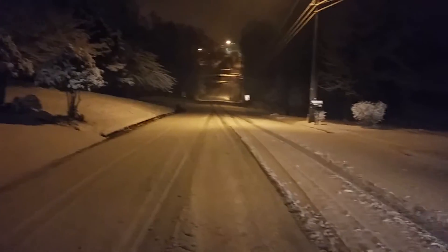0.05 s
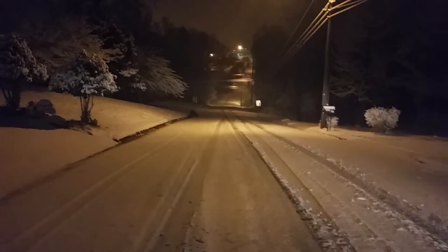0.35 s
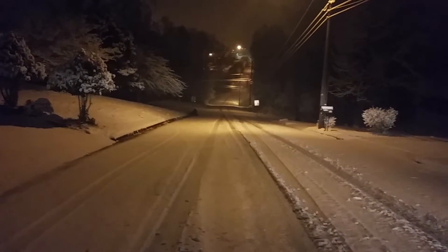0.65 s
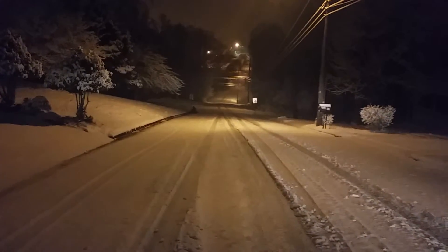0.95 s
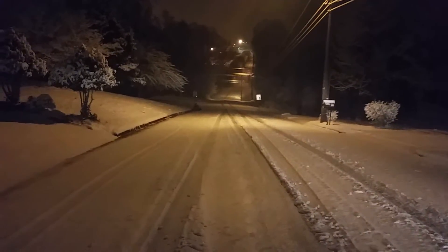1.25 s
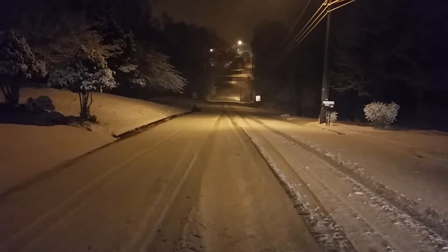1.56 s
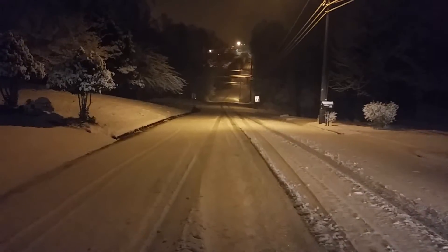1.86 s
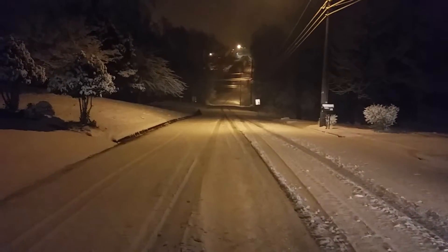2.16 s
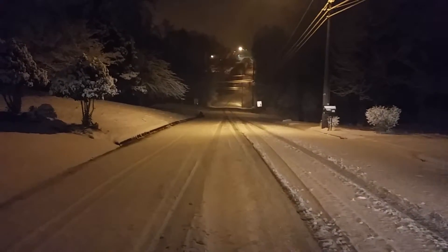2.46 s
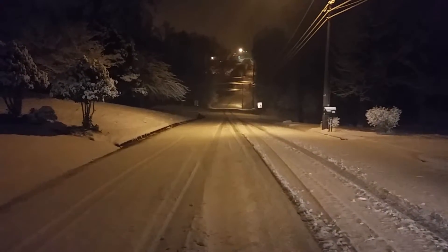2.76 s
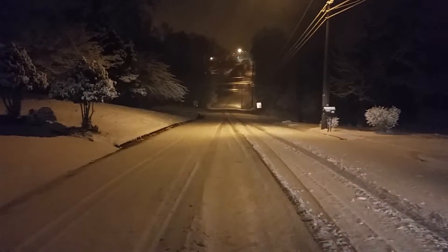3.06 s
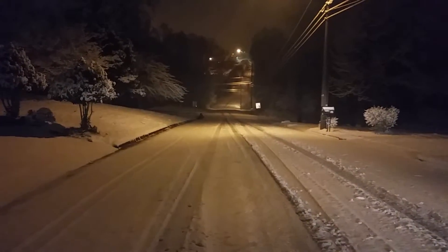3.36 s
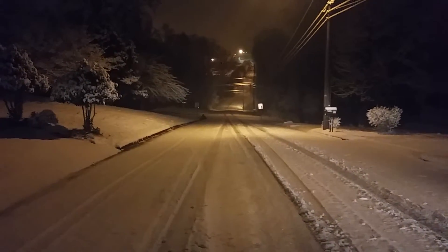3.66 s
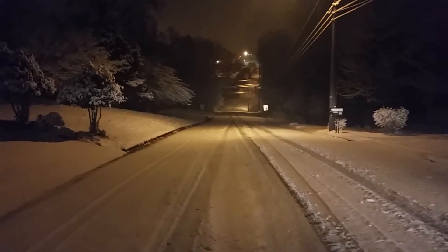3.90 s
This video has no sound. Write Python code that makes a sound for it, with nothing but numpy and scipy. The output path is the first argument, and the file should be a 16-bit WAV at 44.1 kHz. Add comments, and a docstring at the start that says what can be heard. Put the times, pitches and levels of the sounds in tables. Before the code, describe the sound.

A car idles close by with soft exhaust pops, while icy snow ticks over thin hiss.

```python
"""A quiet snowy roadside at night, in stereo. From the start a car idles close by, off to the right: its
engine hums and its exhaust rumbles, with soft irregular pops, probably sputter. Icy flakes tick on the
microphone over a steady thin hiss. In the first second there is a brief rustle, then a faint hoot from
far away. The pops grow stronger in the second half, and another hoot comes just before three seconds."""
import sys
import numpy as np
from scipy import signal
from scipy.fft import rfft, irfft
from scipy.io import wavfile
from scipy.ndimage import uniform_filter1d

SR = 44100
rng = np.random.default_rng(int(sys.argv[2]) if len(sys.argv) > 2 else 0)


def to_wav(sig):
    """Store sig (one row per channel, or 1-D mono) as 16-bit WAV at the path in sys.argv[1].

    Samples outside -1..1 are clipped; the rate is SR.
    """
    pcm = np.clip(np.atleast_2d(sig), -1, 1) * 32767
    pcm = np.round(pcm).astype(np.int16)
    wavfile.write(sys.argv[1], SR, pcm.T)  # frames by channels


N = 176400


def undb(db):
    """Decibels to gain."""
    return 10 ** (np.asarray(db) / 20)


def unit(x):
    """Scale to rms 1."""
    return x / np.sqrt(np.mean(x ** 2))


def freqs():
    """Frequency of each spectral bin."""
    return np.maximum(np.arange(N // 2 + 1) * SR / N, 1e-3)


def colour(x, points):
    """Filter by a curve of (Hz, dB) points."""
    hz, db = np.array(points).T
    return irfft(rfft(x) * undb(np.interp(np.log(freqs()), np.log(hz), db)), N)


def noise(points):
    """Noise with a spectrum given in dB per Hz."""
    return colour(rng.standard_normal(N), points) * np.sqrt(SR / 2)


def resonate(x, hz, width_hz):
    """One resonance, gain 1 at its centre."""
    return signal.lfilter(*signal.iirpeak(hz, hz / width_hz, fs=SR), x)


def walk(rate):
    """Smooth random drift with a spread near 1."""
    k = max(int(SR / rate), 1)
    steps = np.repeat(rng.standard_normal(N // k + 1), k)
    return unit(uniform_filter1d(uniform_filter1d(steps, k), k)[:N])


def pan(db):
    """Left and right gains for a level difference."""
    return undb(np.array([[db], [-db]]) / 2)


def add(out, start_s, x):
    """Mix a short sound in at a given time."""
    i = int(np.clip(start_s * SR, 0, N - 1))
    out[..., i:i + x.shape[-1]] += x[..., :N - i]


# The engine's hum, close by. Each row: multiple of the cycle rate, level in dB.
ENGINE_HARMONICS = [(6, -48), (12, -54.5), (14, -57.5), (18, -43.5), (21, -44), (24, -51.5), (26, -49),
                    (30, -52.5)]
# The exhaust's rumble. Each row: frequency in Hz, level in dB per Hz.
EXHAUST_RUMBLE = [(15, -104), (30, -91), (50, -71.5), (70, -62.5), (150, -64.5), (210, -68), (300, -70),
                  (500, -81), (720, -82), (1000, -94), (1600, -102), (4000, -140)]


def idle():
    """Harmonics of the slightly unsteady engine cycle over the rumble of the exhaust."""
    cycle_hz, wander = 6.0, 0.0035  # one cycle is two turns of the crank
    flutter_db, swell_db = 2, 1.83
    phase = 2 * np.pi * np.cumsum(cycle_hz * (1 + wander * walk(4.1))) / SR
    hum = np.zeros(N)
    for multiple, db in ENGINE_HARMONICS:
        level = undb(db + flutter_db * walk(6.04))
        hum += level * np.sin(multiple * phase + rng.uniform(0, 2 * np.pi))
    rumble = noise(EXHAUST_RUMBLE) * undb(swell_db * walk(20))
    return np.sqrt(2) * hum + rumble


# Pops at the tailpipe. Each row: start in seconds, relative level in dB, brightness in dB.
EXHAUST_POPS = [(.126, -29.5, -22.5), (.295, -28, -19), (.528, -29, -26), (.569, -29.5, -25.5),
                (.588, -33.5, -11.5), (.612, -27.5, -28), (0.648, -27, -27), (.724, -25, -23.5),
                (.731, -29, -14), (.813, -32.5, -17.5), (.874, -26.5, -21), (.907, -23.5, -17.5),
                (.952, -29, -18), (.993, -31.5, -17), (1.051, -25.5, -20.5), (1.155, -28, -21.5),
                (1.207, -32, -19.5), (1.32, -23, -19), (1.401, -21.5, -22), (1.471, -25.5, -21),
                (1.534, -29, -18), (1.61, -27, -19), (1.707, -31.5, -19.5), (1.77, -29.5, -18),
                (1.809, -28.5, -19), (1.943, -20.5, -17), (2.004, -27.5, -21), (2.079, -28, -18),
                (2.18, -29, -23), (2.23, -23, -19), (2.262, -23.5, -21), (2.323, -27.5, -19.5),
                (2.388, -28, -18.5), (2.449, -28.5, -24.5), (2.513, -17.5, -20), (2.57, -27.5, -20),
                (2.627, -29, -22.5), (2.741, -24, -18), (2.798, -20.5, -19), (2.909, -29, -17),
                (3.034, -26, -19.5), (3.201, -17.5, -14.5), (3.369, -21, -16.5), (3.436, -26.5, -20.5),
                (3.464, -26.5, -16.5), (3.607, -25.5, -20), (3.642, -26.5, -22.5), (3.827, -26, -20)]
# The silencer's tone on the pops. Each row: frequency in Hz, gain in dB.
SILENCER_TONE = [(40, 2), (110, -2.5), (210, -2), (290, 3.5), (500, -1.5), (750, -2.5), (1100, 1.5),
                 (1500, 5.5), (3000, 11)]


def exhaust_pops(t):
    """Each puff of gas is one push and pull of air; it scatters off car and road and rings the pipe."""
    lead_s, rise_s, usual_width_s = .02, 0.00323, 0.00074
    usual_bright_db, halving_db = -17.5, 7.5  # a pop this much brighter is half as wide
    echo_gap_s, echo_decay_s = .003, 0.011
    weak_per_s, weak_db, weak_spread_db = 10, -38.5, 6  # sputter between the main pops
    age, out = t[:SR // 10], np.zeros(N)
    echoes = rng.standard_normal((200, len(age)))
    chances = rng.random((100, 2))[:int(weak_per_s * N / SR)]
    weak = [(when * N / SR, weak_db + weak_spread_db * (2 * size - 1), usual_bright_db)
            for when, size in chances]
    echo_fade = np.exp(-age / echo_decay_s) * (age > echo_gap_s)
    for (start, db, bright_db), echo in zip(EXHAUST_POPS + weak, echoes):
        width_s = usual_width_s * 2 ** ((usual_bright_db - bright_db) / halving_db)
        u = (age - lead_s - rise_s) / width_s
        puff = -u / (1 + u ** 2) ** 2
        scatter = unit(signal.fftconvolve(puff, echo * echo_fade)[:len(age)]) * np.std(puff)
        pop = (puff + undb(-4) * scatter) / puff.max()
        add(out, start - lead_s, undb(db + 3) * pop)
    thinned = signal.lfilter(*signal.butter(1, 148, "high", fs=SR), out)
    silenced = colour(thinned, SILENCER_TONE)
    pipe_ring = resonate(silenced, hz=133, width_hz=72)
    return silenced + undb(-5.5) * pipe_ring


# How late the car reaches the left microphone. Each row: frequency in Hz, delay in seconds.
LEFT_MIC_DELAY = [(100, 0.00029), (400, 0.00044), (720, 0.00037), (1100, 0.00032), (1500, 0.00032)]


def car(t):
    """The car stands close by on the right, so its sound reaches the right microphone first."""
    right = idle() + exhaust_pops(t)
    delay_s = np.interp(freqs(), *np.array(LEFT_MIC_DELAY).T)
    left = irfft(rfft(right) * np.exp(-2j * np.pi * freqs() * delay_s), N)
    return np.array([left, right]) * pan(db=0.1)


# Fine sizzle of falling snow. Each row: frequency in Hz, relative level in dB per Hz.
SNOW_SIZZLE = [(4000, -140), (6800, -122), (8300, -116), (9100, -105), (10000, -95), (10800, -96.5),
               (11700, -102.5), (15800, -103.5)]
# The snowfall swells and eases. Each row: time in seconds, relative level in dB.
SNOWFALL_LEVEL = [(0.0, -66), (0.65, -60), (1.25, -67), (1.93, -68), (2.27, -64.5), (3.54, -66.5),
                  (3.71, -63.5), (4.0, -64)]
# Flakes that strike the microphone. Each row: start in seconds, relative level in dB,
# left minus right in dB, relative gain of the duller body in dB, decay in seconds.
FLAKE_HITS = [(0.1604, -26, 3, -24, 0.0011), (0.384, -25, 6.5, 4.5, 0.0013),
              (.558, -37.5, 3.5, -1.5, 0.0033), (0.7093, -31.5, 2, 2.5, 0.0017),
              (1.474, -38, 3, -16, 0.0014), (1.5368, -32.5, 2, -1, 0.0014), (1.6581, -39, -2, -11, 0.0015),
              (1.69, -37, 2, -18, 0.0011), (2.078, -44, 0, 3, .0013), (2.602, -29.5, -2, -2, 0.0018),
              (2.822, -43, 6, -2, 0.0012), (2.832, -45, 4, 7, .0015), (3.051, -35.5, 0, -19, .0013),
              (3.204, -27.5, 4, -16, 0.0011), (3.245, -34, -4, -7, .001), (3.3343, -35, 9, -12, 0.00079),
              (3.463, -36.5, 2, -8, 0.0015), (3.7438, -29.5, 3, -6.5, .0012), (3.83, -39.5, 2, 10, 0.0015)]
# The casing's bright ring under a flake, and its duller body. Each row: frequency in Hz, gain in dB.
CASING_RING = [(1000, -44), (6000, -9), (7800, -14.5), (9000, -4), (10000, 8.5), (11500, -1.5),
               (16000, -8.5)]
CASING_BODY = [(200, -30), (900, -17), (2200, 7), (4000, 0), (6000, -10.5), (9000, -28), (16000, -39)]


def snow(t):
    """Right at the microphone: a fine sizzle, a patter of tiny grains, flakes ticking on the casing."""
    grains_per_s, grain_db, grain_spread_db, grain_decay_s = 220, -52.5, 4, 0.00089
    when, fall_db = np.array(SNOWFALL_LEVEL).T
    snowfall = undb(np.interp(t, when, fall_db - fall_db.mean()))
    sizzle = np.array([noise(SNOW_SIZZLE), noise(SNOW_SIZZLE)]) * undb(-1 + walk(29.7))
    age = t[:SR // 50]
    landings = rng.random(N) < grains_per_s / SR
    grains = landings * undb(grain_db + grain_spread_db * np.clip(rng.standard_normal(N), -2, 2))
    patter = signal.fftconvolve(grains, np.exp(-age / grain_decay_s))[:N]
    ring = patter * rng.standard_normal((2, N)) * snowfall
    body = np.zeros((2, N))
    for start, db, pan_db, body_db, decay_s in FLAKE_HITS:
        burst = rng.standard_normal((2, len(age))) * np.exp(-age / decay_s)
        tick = burst * pan(pan_db) * undb(db - 2.5)
        add(ring, start, tick)
        add(body, start, tick * undb(body_db - 2.5))
    return sizzle * snowfall + colour(ring, CASING_RING) + colour(body, CASING_BODY)


# Swishes on both microphones. Each row: centre in seconds, half-width in seconds, level in dB.
SWISHES = [(0.238, 0.028, -45.5), (0.361, 0.034, -52), (0.476, .03, -54.5), (0.767, 0.0068, -52),
           (0.82, 0.006, -53), (0.917, 0.047, -65)]


def rustle(t):
    """Short soft swells of noise, like a sleeve moving."""
    hz, width_hz = 2040, 1170
    swell = sum(undb(db) * np.exp(-((t - at) / spread) ** 2 / 2) for at, spread, db in SWISHES)
    rub = resonate(rng.standard_normal((2, N)), hz, width_hz)
    return swell * unit(resonate(rub, hz, width_hz))


# Distant hoots. Each row: start and length in seconds, first, middle and last pitch in Hz, level in dB.
FAR_HOOTS = [(0.862, 0.13, 707, 724, 614, -48), (2.833, .075, 660, 765, 794, -47)]


def hoots(t):
    """Faint gliding tones from far off, perhaps a dog."""
    roughness, octave_db = 0.0221, -19
    out = np.zeros(N)
    for start, length, first_hz, middle_hz, last_hz, db in FAR_HOOTS:
        progress = np.clip((t - start) / length, 0, 1)
        glide = np.polyfit([0, .5, 1], [first_hz, middle_hz, last_hz], 2)
        hz = np.polyval(glide, progress) * (1 + roughness * walk(200))
        phase = 2 * np.pi * np.cumsum(hz) / SR
        tone = np.sin(phase) + undb(octave_db) * np.sin(2 * phase)
        out += undb(db) * np.sin(np.pi * progress) * tone
    return np.sqrt(2) * out


# Night air at each microphone, and a narrow hiss near 4 kHz on the left one alone.
# Each row: frequency in Hz, level in dB per Hz.
LEFT_MIC_AIR = [(20, -88), (45, -86), (100, -73), (300, -80), (700, -87.5), (1400, -92), (2200, -92),
                (2850, -99.5), (4500, -104), (6200, -111), (7000, -117), (16000, -114)]
RIGHT_MIC_AIR = [(20, -86), (45, -78), (100, -74.5), (300, -86.5), (700, -86.5), (1400, -88), (2200, -86.5),
                 (2850, -99.5), (3600, -99.5), (4600, -106), (5400, -108), (6800, -120), (16000, -115)]
LEFT_MIC_HISS = [(2400, -140), (3050, -105), (3400, -90), (3950, -73.5), (4200, -76.5), (4550, -88.5),
                 (4900, -81), (5300, -83.5), (5900, -90.5), (6700, -118), (8000, -140)]


def hiss():
    """Steady air noise, unrelated on the two sides, with a narrow hiss on the left."""
    flicker_db = 1.25
    air = np.array([noise(LEFT_MIC_AIR), noise(RIGHT_MIC_AIR)]) * undb(flicker_db * walk(20))
    return air + np.array([noise(LEFT_MIC_HISS), np.zeros(N)])


def scene():
    """Everything heard from the roadside."""
    t = np.arange(N) / SR
    return car(t) + hiss() + snow(t) + rustle(t) + hoots(t)


def record(dry):
    """The recorder cuts the highest treble steeply."""
    top_hz = 15800
    return signal.sosfilt(signal.ellip(10, .2, 80, top_hz, fs=SR, output="sos"), dry)


dry = scene()
out = record(dry)
to_wav(out)
```